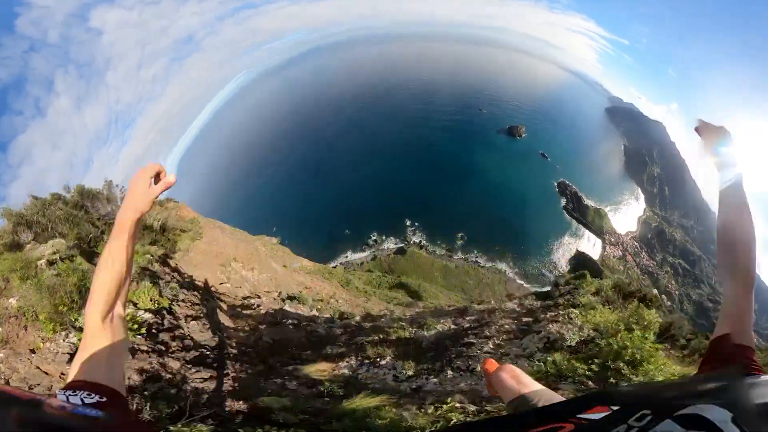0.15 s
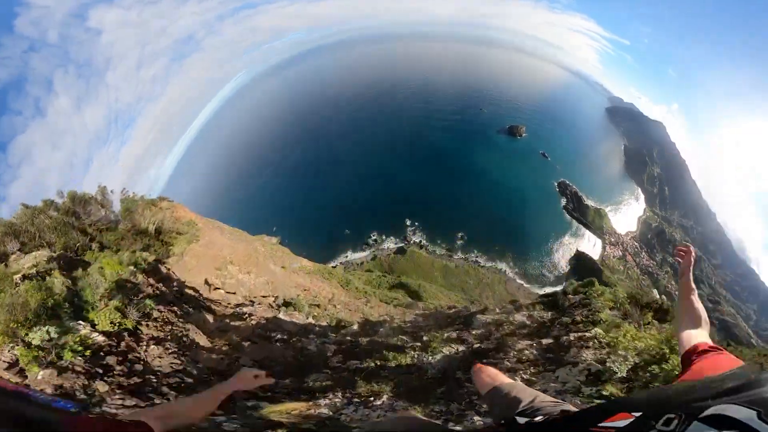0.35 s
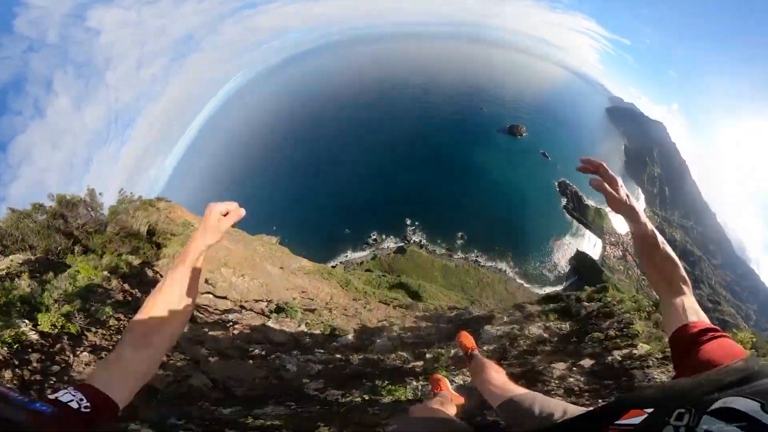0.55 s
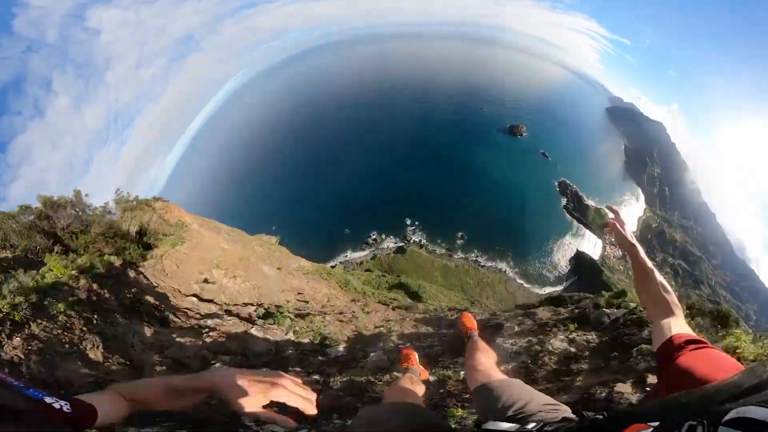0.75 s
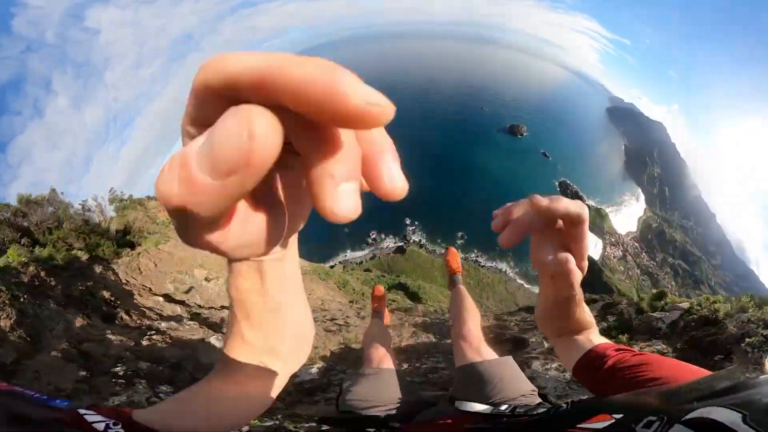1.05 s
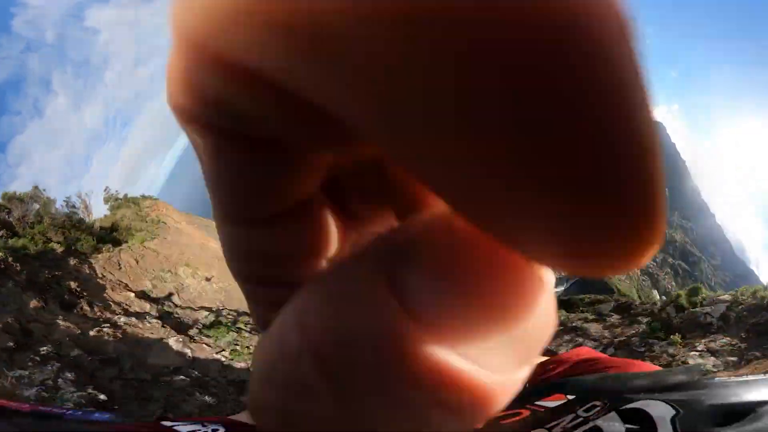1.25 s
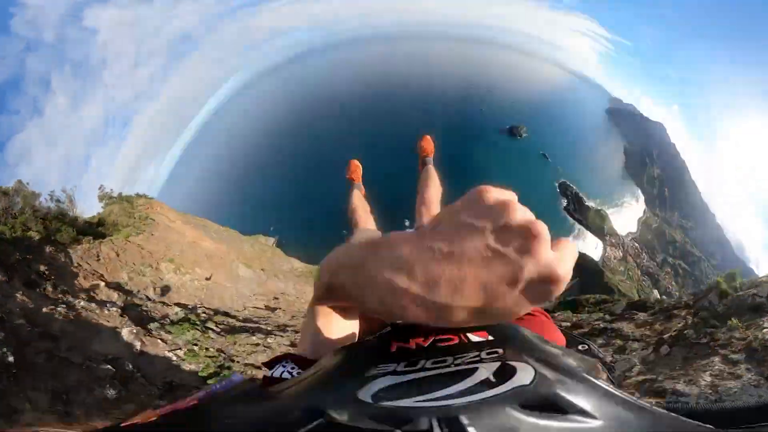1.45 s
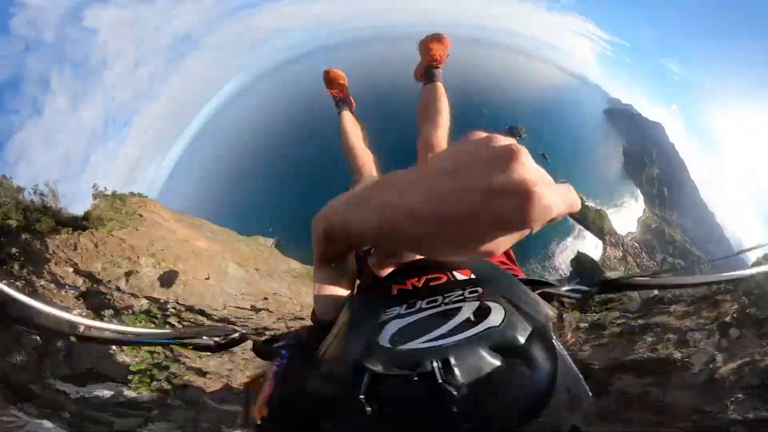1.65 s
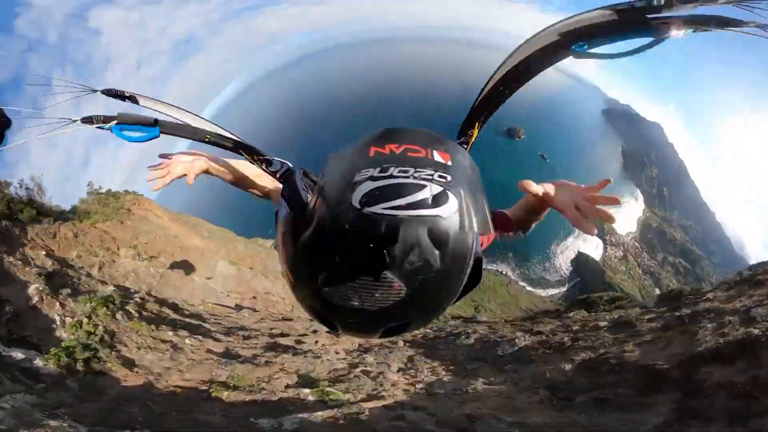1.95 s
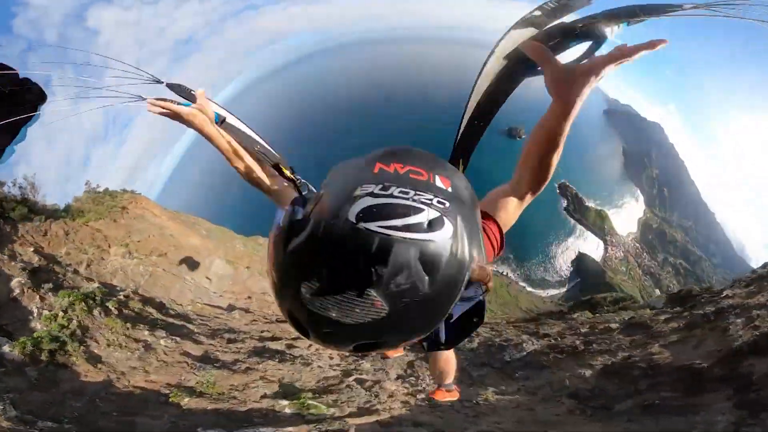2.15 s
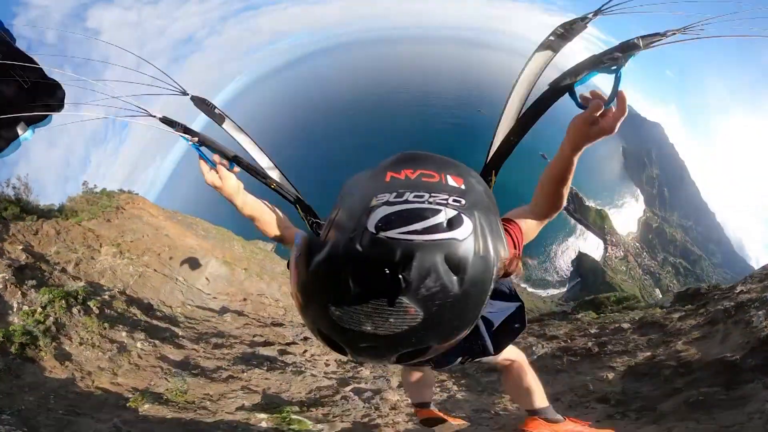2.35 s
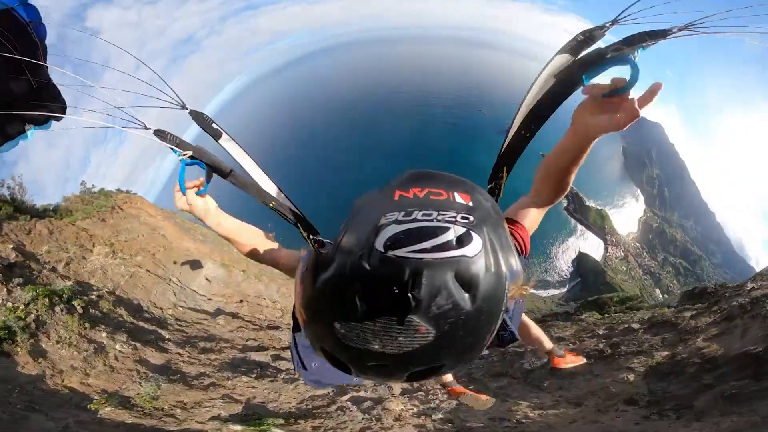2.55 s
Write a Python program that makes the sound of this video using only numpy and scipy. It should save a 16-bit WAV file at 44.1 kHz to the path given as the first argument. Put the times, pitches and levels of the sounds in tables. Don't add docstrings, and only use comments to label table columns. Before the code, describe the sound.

Wind rumbles and tears across a small close microphone outdoors, popping early and roughest in the middle; nylon rustles, lines and buckles snap, then the wind eases to a brief swish and late clicks.

```python
import sys
import numpy as np
from scipy import signal
from scipy.fft import rfft, irfft
from scipy.io import wavfile
from scipy.ndimage import uniform_filter1d

SR = 44100
rng = np.random.default_rng(int(sys.argv[2]) if len(sys.argv) > 2 else 0)


def pcm_store(signal):
    levels = np.round(np.clip(np.atleast_2d(signal), -1, 1) * 32767)
    wavfile.write(sys.argv[1], SR, levels.astype(np.int16).T)


def level_to_linear(level):
    exponent = np.asarray(level, float) / 20
    return 10 ** exponent


N = 119070


def evened(x):
    return x / np.sqrt(np.mean(x ** 2) + 1e-20)


def read(points, hz):
    f, value = np.transpose(points)
    return np.interp(np.log(hz + 1), np.log(f + 1), value)


def add(mix, start_s, sound):
    part = mix[max(round(start_s * SR), 0):][:len(sound)]
    part += sound[:len(part)]


def colour(x, db_of_hz):
    gain = level_to_linear(db_of_hz(np.fft.rfftfreq(len(x), 1 / SR)))
    return irfft(rfft(x) * gain, len(x))


def resonate(x, hz, width_hz):
    turn = np.exp(2j * np.pi * np.cumsum(hz * np.ones(len(x))) / SR)
    r = np.exp(-np.pi * width_hz / SR)
    smooth = signal.lfilter([1 - r], [1, -r], x / turn + 1e-18)
    return 2 * (turn * smooth).real


def lumps(per_s):
    size = max(int(SR / per_s), 2)
    return evened(uniform_filter1d(uniform_filter1d(rng.standard_normal(N), size), size))


def bell(hz, centre_hz, octaves):
    distance = np.log2(hz / centre_hz + 1e-3) / octaves * 2
    return -6 * (np.sqrt(1 + distance ** 2) - 1)


def steadied(x, size):
    power = uniform_filter1d(uniform_filter1d(evened(x) ** 2, size), size)
    return evened(x / (power + 0.15) ** (0.8 / 2))


# t/s, rumble level/dB, small eddies over rumble/dB, roughness level/dB
WIND = [(.03, -35.5, -6.5, -54), (.2, -31.5, -9, -50), (.27, -22.5, -10, -49.5), (.44, -21, -20.5, -50),
        (.54, -23.5, -7.5, -48), (.6, -18, -11, -45), (1.051, -20.5, -7, -50), (1.24, -19, -8.5, -43.5),
        (1.421, -12, -4, -36.5), (1.6, -16.5, -10.5, -35.5), (1.69, -13.5, -13.5, -29.5),
        (1.78, -19, 0.5, -32.5), (1.93, -14, -7.5, -28), (2.181, -20.5, -10, -46), (2.25, -31.5, -6, -45),
        (2.38, -22.5, -16, -44.5), (2.5, -31.5, -0.5, -55), (2.56, -36, -10, -56.5)]
# f/Hz, density/dB per Hz
RUMBLE = [(8.8, -45), (15, 5), (49, 5), (102, -2), (160, -21), (210, -45), (350, -120)]
EDDIES = [(65, -25), (110, 1), (180, -7), (600, -37.5), (780, -70), (1320, -120)]
ROUGH = [(180, -36.5), (300, -2.5), (809, -10), (875, -12), (961, -11), (1830, -19.5), (2010, -24),
         (5260, -33), (12900, -64), (16800, -87), (22000, -120)]


def wind():
    s, rumble_db, eddy_db, rough_db = np.transpose(WIND)
    t = np.arange(N) / SR
    rumble = steadied(colour(rng.standard_normal(N), lambda f: read(RUMBLE, f)), size=1500)
    eddies = steadied(colour(rng.standard_normal(N), lambda f: read(EDDIES, f)), size=1500)
    eddies = evened(eddies * level_to_linear(4.0 * lumps(63)))
    flicker = level_to_linear(1.5 * lumps(68) + 1.37 * lumps(380))
    rough = evened(colour(rng.standard_normal(N) * flicker, lambda f: read(ROUGH, f)))
    return (rumble * level_to_linear(np.interp(t, s, rumble_db))
            + eddies * level_to_linear(np.interp(t, s, rumble_db + eddy_db))
            + rough * level_to_linear(np.interp(t, s, rough_db) - 1.5))


# centre t/s, half length/s, level/dB, corner f/Hz
GUSTS = [(.245, 0.03, -38, 324), (0.276, 0.037, -27, 307), (0.517, .03, -27, 296),
         (0.616, 0.063, -20.5, 268), (.78, 0.0368, -28.5, 270), (0.855, .04, -22.5, 276),
         (0.944, .025, -43.5, 393), (1.002, 0.033, -48, 300), (1.047, .05, -20, 301),
         (1.066, .035, -36.5, 600), (1.189, .03, -25, 330), (1.229, .015, -35.5, 476),
         (1.304, 0.0477, -22, 293.3), (1.324, .012, -28, 530), (1.37, 0.0461, -28.5, 510.4),
         (1.451, .03, -29.5, 670), (1.474, .016, -24, 880), (1.492, .012, -22, 980),
         (1.51, .04, -27.5, 600), (1.545, .03, -30, 553), (1.573, 0.012, -32, 506), (1.621, .04, -39, 494),
         (1.683, .008, -25, 1290), (1.69, .03, -23, 484), (1.706, .04, -36, 584), (1.797, .01, -30, 910),
         (1.823, .015, -27, 606), (1.866, .02, -26.5, 760), (1.891, .03, -34, 800),
         (1.936, 0.022, -24.5, 810), (1.974, .02, -28, 700), (1.987, .04, -27.5, 296),
         (2.017, 0.015, -30, 596), (2.111, 0.045, -38, 622), (0.387, 0.03, -30, 200),
         (1.885, 0.027, -23, 200), (2.31, 0.063, -33.5, 202), (2.53, 0.036, -42, 273)]
GUST_SLOPE_DB, GUST_TOP_HZ = -11.5, 4000
DULL_HZ = 380


def gust(centre, length, level_db, corner_hz):
    n = int(2 * length * SR)
    jag = level_to_linear(1.5 * evened(uniform_filter1d(rng.standard_normal(n), 70)))

    def spectrum(f):
        slope = GUST_SLOPE_DB / 2 * (1 + (DULL_HZ / corner_hz) ** 3)
        fall = slope * np.log2(1 + (f / corner_hz) ** 2)
        low_cut = -6 * np.log2(1 + (0.19 * corner_hz / (f + 1)) ** 2)
        return fall + low_cut - 6 * np.log2(1 + (f / GUST_TOP_HZ) ** 2)

    air = evened(colour(rng.standard_normal(n) * jag, spectrum))
    return centre - length, level_to_linear(level_db) * air * np.hanning(n) ** 0.62


# t/s, level/dB, start f/Hz
POPS = [
    (0.3192, -7, 940),
    (0.346, -15, 950),
    (.945, -20.5, 380),
    (1.228, -12, 380),
    (1.816, -16.5, 415),
    (2.365, -26, 230),
]
POP_RISE_S, POP_FALL_S, POP_DECAY_S = 0.0013, 0.0016, 0.0065
POP_END_HZ = 88.5


def pop(s, level_db, start_hz):
    t = np.arange(1764) / SR
    quick = t * start_hz / 900
    hz = POP_END_HZ + start_hz * np.exp(-quick / POP_FALL_S)
    shape = (1 - np.exp(-quick / POP_RISE_S)) ** 2 * np.exp(-t / POP_DECAY_S)
    wave = np.sin(2 * np.pi * np.cumsum(hz) / SR + 5.64)
    return s, level_to_linear(level_db) * shape / shape.max() * wave


def puff():
    start_s, length_s, level_db, hz, width_hz = 0.215, 0.061, -34, 308, 56.3
    n = int(length_s * SR)
    moan = resonate(resonate(rng.standard_normal(4000), hz, width_hz), hz, width_hz)[-n:]
    return start_s, level_to_linear(level_db) * evened(moan) * np.hanning(n)


# start t/s, length/s, level/dB, centre f/Hz, grain share/0-1
RUSTLES = [(0.037, .09, -83, 4500, 0.5), (.15, .24, -60.5, 2860, 0.66), (0.374, 0.045, -58, 5400, 0.41),
           (0.539, 0.12, -55.5, 4200, 0.37), (1.038, 0.2, -60.5, 2940, 0.7),
           (1.174, .14, -62.5, 4600, 0.23), (1.337, 0.05, -55, 3820, 0.3), (1.405, 0.057, -51, 7600, .5),
           (1.464, 0.13, -55, 4000, 0.6), (1.623, 0.24, -47.5, 4000, 0), (1.779, .06, -38.5, 7810, 0.61),
           (1.79, .15, -44.5, 3500, 0.1), (1.867, 0.17, -40.5, 4150, 0.3), (1.899, 0.099, -41.5, 8000, 0.3),
           (1.958, 0.23, -52, 2274, 0.6), (2.077, 0.17, -50, 4000, 0.35), (2.124, .15, -54, 2017, 0.1),
           (2.189, 0.249, -53.5, 5000, 0.2), (2.358, .24, -52, 3660, .3), (2.436, .08, -55.5, 4600, 0.2),
           (2.556, 0.093, -47, 4000, 0.2), (2.592, 0.13, -45, 4900, 0.2), (2.573, .11, -44, 9500, 0.3)]
GRAINS_PER_S, GRAIN_SPREAD_DB, GRAIN_S = 430, -3.5, 0.0013


def rustle(start, length, level_db, centre_hz, share):
    n = int(length * SR)
    size = rng.exponential(1, n)
    ticks = (rng.random(n) < GRAINS_PER_S / SR) * level_to_linear(GRAIN_SPREAD_DB * np.minimum(size, 3))
    grains = signal.lfilter([1], [1, -np.exp(-1 / (GRAIN_S * SR))], ticks)
    drive = rng.standard_normal(n) * (1 - share + share * evened(grains))
    stroke = np.sin(np.pi * np.linspace(0, 1, n) ** 0.75) ** 1.3
    cloth = colour(drive * stroke, lambda f: bell(f, centre_hz, octaves=1))
    return start, level_to_linear(level_db) * evened(cloth)


# t/s, peak level/dB, centre f/Hz, t60/s, width/octaves
SNAPS = [(.058, -52, 5000, 0.015, .9), (.105, -54, 5500, .02, .9), (0.2598, -56, 3520, .02, 0.65),
         (0.33, -48.5, 3500, 0.018, .9), (.391, -55, 5900, .015, .7), (0.402, -48, 5080, 0.0143, .6),
         (.4988, -50.5, 5000, .01, .9), (1.0553, -51, 2440, 0.05, .8), (1.228, -42, 1900, 0.036, 1.4),
         (1.239, -50, 3500, 0.018, 0.96), (1.4118, -38.5, 3700, 0.029, 0.49), (1.429, -41, 7560, 0.009, .5),
         (1.4414, -37, 7060, .01, 1.2), (1.4554, -22.5, 4000, 0.0045, 1.1), (1.512, -45, 5200, 0.014, 0.37),
         (1.532, -38, 4170, 0.019, 0.4), (1.566, -30.5, 4960, 0.016, 1.2), (1.656, -37, 2140, 0.034, 0.48),
         (1.681, -25, 1670, 0.013, 0.98), (1.681, -39.5, 8600, 0.0313, 0.57), (1.731, -34, 3820, .012, .5),
         (1.7944, -22.5, 3500, 0.025, 0.8), (1.8018, -32, 4500, 0.056, 1.8),
         (1.894, -38, 6000, 0.016, 0.99), (1.9099, -30, 7000, 0.021, .6), (1.932, -31.5, 2780, 0.057, 2),
         (2.133, -46, 5000, .02, 1.5), (2.406, -41, 4200, 0.028, 0.44), (2.438, -55, 4500, 0.013, .9),
         (2.448, -47, 4700, .015, 0.41), (2.463, -41, 4420, 0.028, 0.32), (2.486, -43, 5000, 0.016, .8),
         (2.57, -38, 4200, 0.019, 1.13), (2.6125, -32, 4800, 0.014, .7), (2.629, -35, 4600, .015, .8),
         (2.664, -30, 4200, 0.0137, 0.69), (2.678, -35, 4550, 0.02, 0.45), (1.494, -33, 2600, 0.012, 0.58),
         (1.861, -33.5, 2400, .015, 0.88), (1.971, -39.5, 2200, 0.013, .9)]


def snap(s, level_db, centre_hz, t60, octaves):
    t = np.arange(2200) / SR
    crack = evened(colour(rng.standard_normal(len(t)), lambda f: bell(f, centre_hz, octaves)))
    rise = np.minimum(t / 0.0008, 1)
    return s, crack * rise * level_to_linear(level_db + 3.0 - 60 * t / t60)


# multiple of the pitch, width f/Hz, level/dB
SWISH_PARTS = [
    (.68, 600, -8),
    (1., 700, 0),
    (1.98, 1300, -10),
]


def swish():
    start_s, length_s, level_db, top_hz, bend = 2.205, 0.215, -47, 3380, 0.13
    arch = np.sin(np.pi * np.linspace(0, 1, int(length_s * SR)))
    hz = top_hz * (1 - bend * (1 - arch))
    noise = rng.standard_normal(len(arch))
    whistle = np.zeros(len(arch))
    for multiple, width_hz, part_db in SWISH_PARTS:
        part = resonate(resonate(noise, multiple * hz, width_hz), multiple * hz, width_hz)
        whistle += level_to_linear(part_db) * evened(part)
    return start_s, level_to_linear(level_db) * arch ** 1.25 * whistle


# f/Hz, level/dB
MIC = [(100, 25.5), (6000, -4.5), (7600, -9), (8400, -16), (12000, -25.5), (14500, -42.5)]


def through_mic(cloth):
    return colour(cloth, lambda f: read(MIC, f))


# f/Hz, density/dB per Hz
HISS = [(240, -36), (400, -15.5), (758, -14.5), (943, -15), (1240, -21.5), (5720, -33.5), (12900, -62),
        (16800, -94.5), (22000, -120)]


def hiss():
    swell = level_to_linear(1.1 * lumps(40))
    return level_to_linear(-55) * evened(colour(rng.standard_normal(N) * swell, lambda f: read(HISS, f)))


def scene():
    air, cloth = wind(), np.zeros(N)
    for row in GUSTS:
        add(air, *gust(*row))
    for row in POPS:
        add(air, *pop(*row))
    add(air, *puff())
    for row in RUSTLES:
        add(cloth, *rustle(*row))
    for row in SNAPS:
        add(cloth, *snap(*row))
    add(cloth, *swish())
    return (air + through_mic(cloth) + hiss())[None]


def top_gate(x):
    gate_db, gate_from_hz = -111.5, 8400
    hz, _, z = signal.stft(x, SR, nperseg=2048, noverlap=1024)
    power_db = 10 * np.log10(uniform_filter1d(abs(z) ** 2, size=32, axis=1) + 1e-30)
    under = (power_db < gate_db) & (hz[:, None] > gate_from_hz)
    shut = np.maximum.accumulate(under, axis=1)
    return signal.istft(z * ~shut, SR, nperseg=2048, noverlap=1024)[1][:, :N]


def band_limit(x):
    return signal.sosfilt(signal.butter(12, 14600, fs=SR, output="sos"), x)


def record(dry):
    t = np.arange(N) / SR
    fade = np.minimum(np.minimum(t, t[::-1] * 10) / 0.02, 1)
    mix = top_gate(fade * 0.81 * np.tanh(dry / 0.83))
    return band_limit(mix)


dry = scene()
out = record(dry)
pcm_store(out)
```